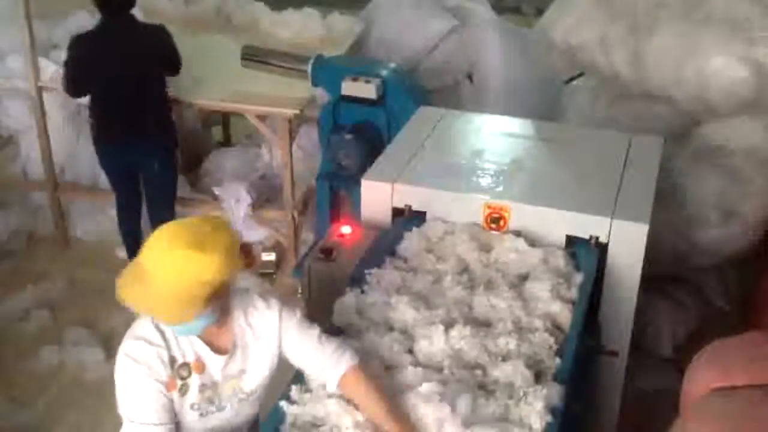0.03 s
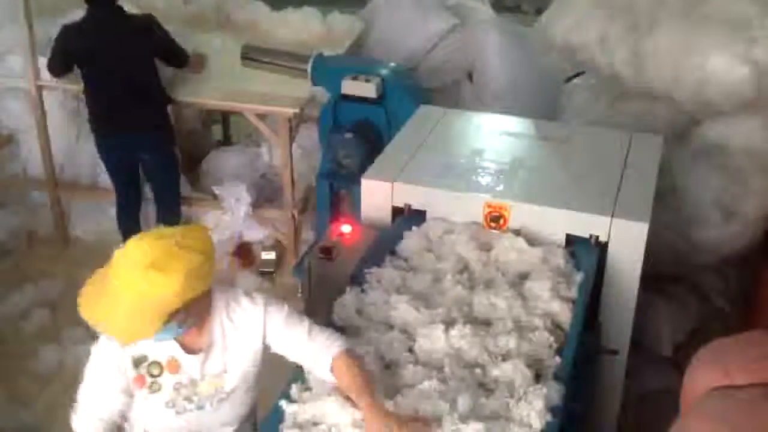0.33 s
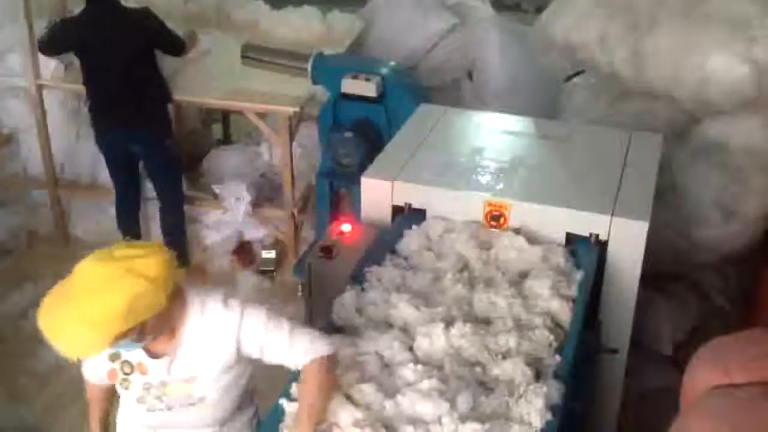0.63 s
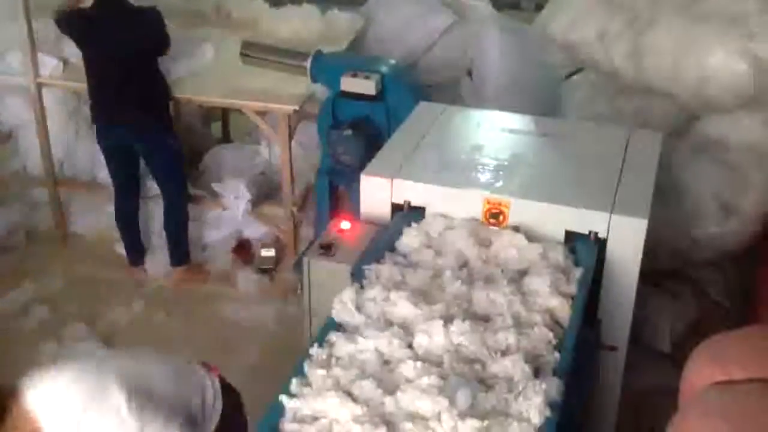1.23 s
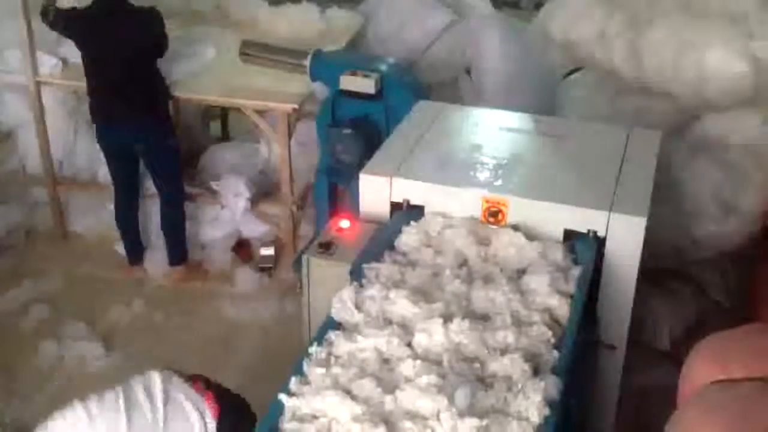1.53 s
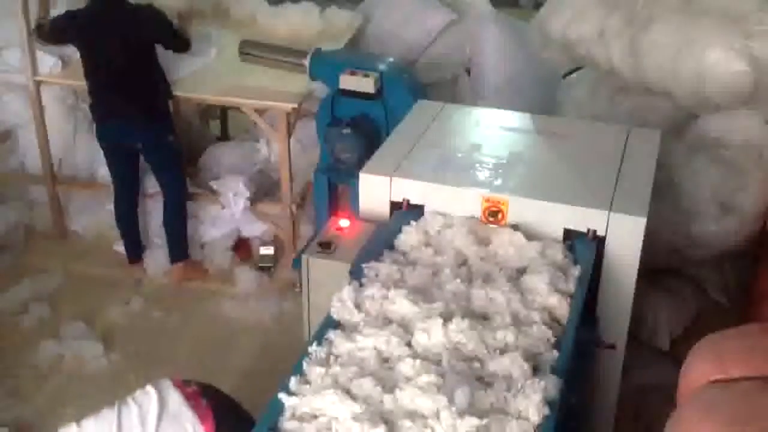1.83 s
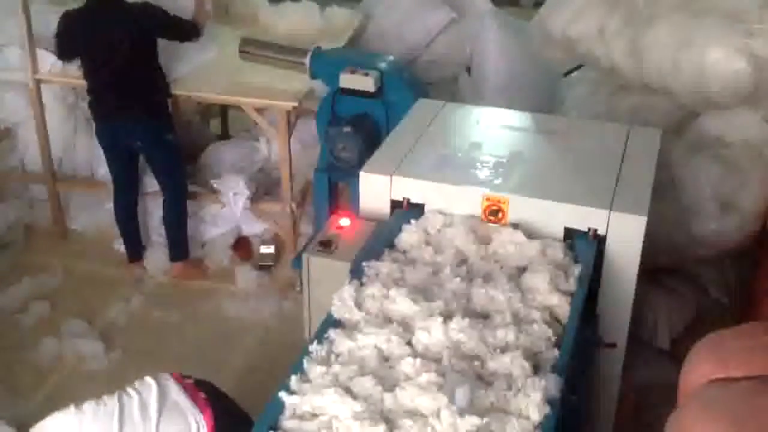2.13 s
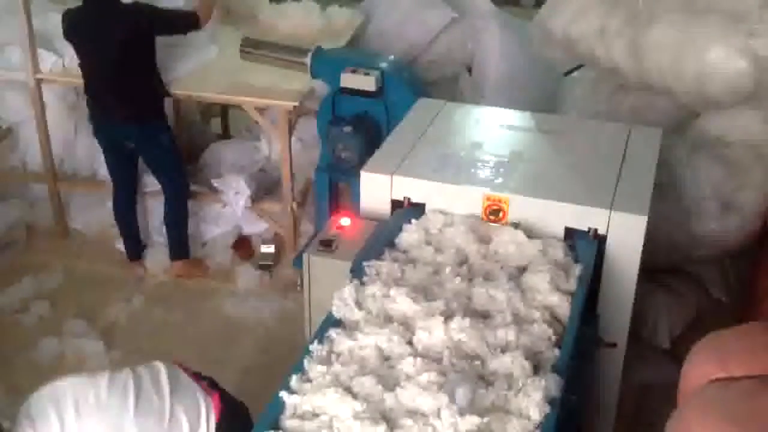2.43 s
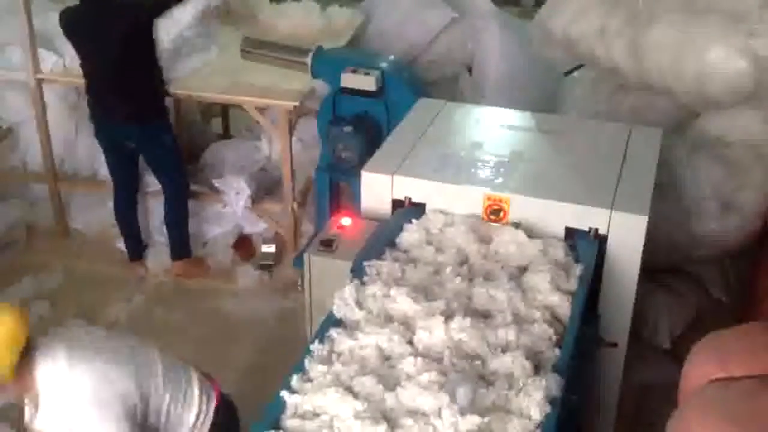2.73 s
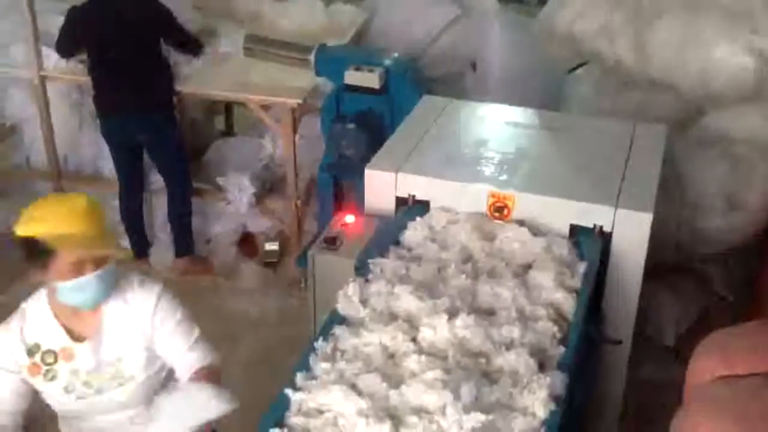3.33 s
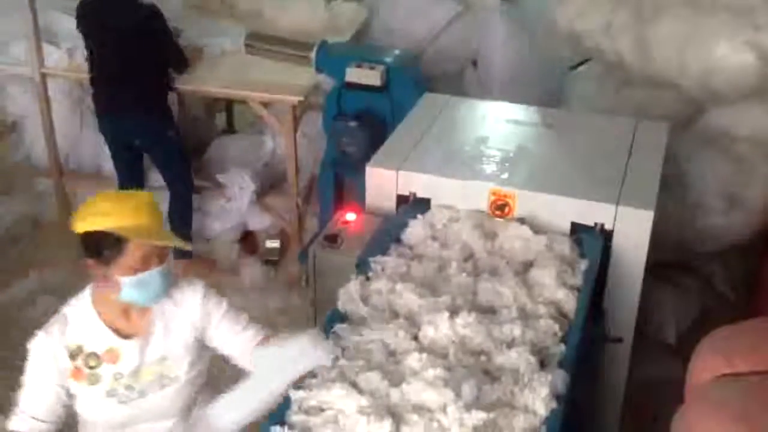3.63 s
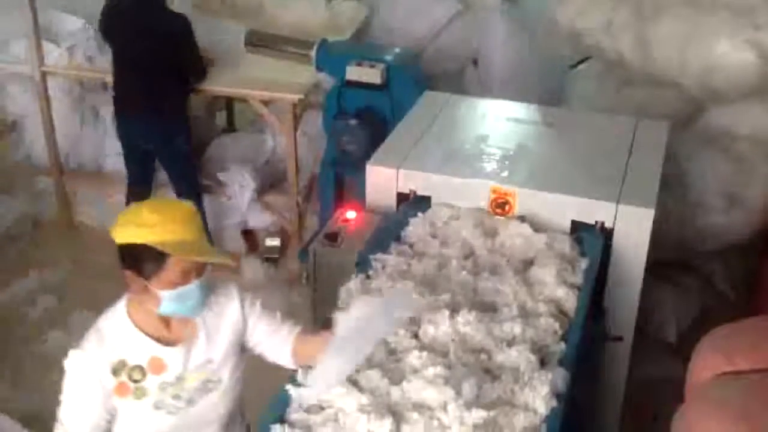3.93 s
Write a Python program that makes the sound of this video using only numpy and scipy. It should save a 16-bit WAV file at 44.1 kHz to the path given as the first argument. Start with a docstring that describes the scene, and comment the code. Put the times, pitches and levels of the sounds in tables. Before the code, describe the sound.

A fiber opening machine runs throughout, a few steps away in a workshop. Its blower drones on one strong, fairly low tone, with a belt throbbing quickly beneath and air whirring through the casing. Two soft, hollow whistles come and go over a faint hiss of fibers. At about 3.5 seconds something hard knocks once, with a low thud and a brief, scraping metallic rattle, while the drone continues.

```python
"""A workshop, with the microphone a few steps from a steadily running fiber opening machine.
Its five-bladed blower drones on one strong tone and the belt drive throbs beneath it. Air whirs through
the resonances of casing and duct, two duct whistles come and go, and fibers hiss in the rollers.
Near the end something hard knocks once and rattles briefly through the machine."""
import sys
import numpy as np
from scipy import signal
from scipy.fft import rfft, irfft, next_fast_len
from scipy.io import wavfile
from scipy.ndimage import map_coordinates

SR = 44100
rng = np.random.default_rng(int(sys.argv[2]) if len(sys.argv) > 2 else 0)


def wav_out(sig):
    """Save sig, one row per channel (or a flat mono array), as 16-bit PCM at SR to the path in sys.argv[1]."""
    wavfile.write(sys.argv[1], SR, np.round(np.clip(np.atleast_2d(sig).T, -1, 1) * 32767).astype(np.int16))


N = 176400
T = np.arange(N) / SR

# Hiss of the fibers, and of a catching tuft. Each row: frequency in Hz, relative density in dB.
HISS_SPECTRUM = [(1500, -24.5), (4000, -5.5), (5300, -3.5), (6100, 1.5), (6900, 1), (7800, -5), (9000, -10),
                 (10000, -12.5), (11300, -8), (12300, -8), (13500, -10), (15200, -15)]
TUFT_SPECTRUM = [(2000, -11), (5000, -3.5), (9500, -2.5), (13000, 0.5), (15200, -6)]
# Tufts catching in the rollers. Each row: peak time in seconds, level in dB, half-width in seconds.
TUFT_CATCHES = [(1.41, -52.5, 0.022), (2.23, -52.5, .06), (2.665, -47.5, .013), (2.97, -52.5, 0.018)]
# Rush of the air. Each row: frequency in Hz, relative density in dB.
AIR_SPECTRUM = [(25, -41), (60, -30), (100, -14), (160, -0.5), (215, 0), (260, 5), (350, 3.5), (445, -1.5),
                (478, -5), (510, -1.5), (750, 0), (1000, -2), (1080, -6), (1320, -8), (1480, -10.5),
                (2100, -9.5), (2700, -13.5), (3600, -21), (5000, -30.5), (9000, -50.5)]
# Resonances of casing and duct. Each row: centre in Hz, width in Hz, rms level in dB.
CASING_MODES = [(161.2, 18, -40.5), (290, 24, -29.5), (325.3, 14, -37), (368.7, 22, -34), (406.8, 6.9, -38),
                (431.3, 12, -40), (567.8, 14, -37), (635.4, 14, -36.5), (667.4, 13, -43.5),
                (689.5, 15, -38.5), (721.6, 12, -40.5), (811.3, 9.8, -39), (909, 10, -36), (974, 14, -40),
                (1123, 12, -44.5), (1206, 16, -43), (1267, 7.4, -45.5), (1361, 45, -43), (1772, 40, -45.5),
                (2240, 14, -52)]
# Rise and fall of the two duct whistles. Each row: time in seconds, relative level in dB.
LOW_WHISTLE_LEVELS = [(0.03, -47), (0.17, -23), (0.3, -38), (0.47, -25), (0.72, -37.5), (0.86, -22),
                      (1.1, -36.5), (1.3, -30), (1.49, -21.5), (1.62, -33), (1.73, -27.5), (2.2, -32.5),
                      (2.36, -24), (2.7, -37.5), (3.18, -45), (3.35, -27), (3.6, -26.5), (3.95, -34.5)]
HIGH_WHISTLE_LEVELS = [(0.05, -34), (0.3, -35), (0.55, -35), (0.9, -27.5), (1.08, -45), (1.25, -41),
                       (1.48, -30), (1.95, -34), (2.16, -38), (2.35, -32), (2.55, -37.5), (2.68, -33),
                       (2.85, -46), (2.97, -25), (3.06, -43.5), (3.4, -31), (3.719, -37), (3.95, -42)]
# Contacts of the knock. Each row: start in seconds, level in dB.
CONTACTS = [(3.538, -25), (3.543, -24.5), (3.555, -24), (3.568, -29)]
# Scrapes around the knock. Each row: peak time in seconds, level in dB, half-width in seconds.
SCRAPE_STROKES = [(3.518, -41, .014), (3.553, -30, .012), (3.611, -36, 0.0066), (3.65, -40, .03)]
# Colour of a contact, and of a scrape. Each row: frequency in Hz, relative density in dB.
CONTACT_SPECTRUM = [(30, -17), (130, -1), (400, -4.5), (1400, -4), (2000, 1), (2600, -5), (3300, -5.5),
                    (4100, -3.5), (4700, -9), (6500, -12.5), (8000, -12), (9200, -24.5), (11000, -21.5),
                    (13200, -10.5), (15200, -20.5)]
SCRAPE_SPECTRUM = [(800, -14), (2000, 1), (2700, -4), (4100, 2.5), (5000, -6), (8000, -14.5),
                   (10000, -25.5)]
# Ring of the struck metal. Each row: frequency in Hz, level in dB, seconds to fall by 60 dB.
METAL_MODES = [(2186, -35, 0.35), (4040, -35, .3), (4100, -35, 0.28), (6070, -47, 0.24), (13250, -43, .2)]
# Low wavering hums of the machine, including side tones of the belt's throb.
# Each row: frequency in Hz, level in dB.
MACHINE_HUMS = [(154, -44.5), (188.5, -49.5), (213.2, -46.5), (308.8, -39), (378, -38.5)]
# Weaker tones of the shaft. Each row: multiple of the shaft speed, level in dB.
SHAFT_ORDERS = [(2, -53), (3, -44.5), (4, -46.5), (10, -40.5), (15, -47.5)]
# Rise and fall of the blade tone. Each row: time in seconds, level in dB.
BLADE_LEVELS = [(0.05, -8.5), (0.83, -10.5), (0.86, -9.5), (1.93, -9.5), (1.99, -12), (2.07, -9),
                (2.41, -10), (2.57, -8), (2.8, -11.5), (2.96, -8.5), (3.32, -10.5), (3.51, -8.5),
                (3.58, -10.5), (3.64, -6.5), (3.69, -12), (3.8, -7), (3.91, -11.5), (3.95, -9.5)]


def amp(db):
    """Decibels to gain."""
    return 10 ** (np.asarray(db) / 20)


def unit(x):
    """Scale to rms 1."""
    return x / np.sqrt(np.mean(x ** 2) + 1e-20)


def wobble(rate):
    """A smooth random curve with rate knots a second."""
    return map_coordinates(rng.standard_normal(1024), [T * rate + 2], mode="wrap")


def filtered(x, response):
    """Filter x by a gain given as a function of Hz."""
    size = next_fast_len(N + 8192)
    return irfft(rfft(x, size) * response(np.fft.rfftfreq(size, 1 / SR)), size)[:N]


def noise(spectrum):
    """Noise of rms 1, coloured by rows of Hz and dB."""
    knots_hz, db = np.transpose(spectrum)
    colour = lambda hz: amp(np.interp(np.log(hz + 1), np.log(knots_hz), db))
    return unit(filtered(rng.standard_normal(N), colour))


def resonance(centre_hz, width_hz):
    """Noise of rms 1 ringing in one steep-sided resonance."""
    band = lambda hz: 2j * hz * width_hz / (centre_hz ** 2 - hz ** 2 + 2j * hz * width_hz)
    return unit(filtered(rng.standard_normal(N), lambda hz: band(hz) ** 3))


def tone(cycles):
    """A sine of rms 1 with a random starting phase."""
    return np.sqrt(2) * np.sin(2 * np.pi * (cycles + rng.random()))


def decay(start, t60):
    """An envelope that jumps up at start and falls 60 dB in t60 seconds."""
    return (T >= start) * np.exp(-np.log(1000) * np.maximum(T - start, 0) / t60)


def swells(rows):
    """An envelope with one bell-shaped swell for each row."""
    return sum(amp(db) * np.exp(-.5 * ((T - peak) / width) ** 2) for peak, db, width in rows)


def workshop(x, walls_db=-11, low_cut_hz=400):
    """Short reflections off the walls join the direct sound; the overall level stays the same."""
    tail = (rng.standard_normal(N) * decay(.004, t60=.3))[:SR // 2]
    echo = signal.fftconvolve(x, tail / np.linalg.norm(tail))[:N]
    echo = filtered(echo, lambda hz: hz / (hz + low_cut_hz))
    return unit(x + amp(walls_db) * echo) * np.std(x)


def fibers(hiss_db=-45):
    """Fibers in the rollers give a faint, fluttering hiss, brighter for a moment where a tuft catches."""
    hiss = amp(hiss_db + 0.56 * wobble(20) + .3 * wobble(3)) * noise(HISS_SPECTRUM)
    return hiss + swells(TUFT_CATCHES) * noise(TUFT_SPECTRUM)


def belt(hum_hz=165.4, turn_hz=11.37, level_db=-35.5, depth=.75, uneven_db=2):
    """A low hum swells, unevenly, once for each turn of the belt."""
    turns = turn_hz * (T - .03) + 0.046 * wobble(4.8)
    throb = 1 + depth * np.cos(2 * np.pi * turns)
    return amp(level_db) * unit(amp(uneven_db * wobble(8)) * throb * tone(hum_hz * T))


def duct_whistles(low_hz=634, high_hz=927, trim_db=-1, flutter_db=1, slip_cycles=0.2):
    """Two hollow whistles come and go in the duct, unsteady in level and pitch."""
    whistles = 0
    for hz, levels in ((low_hz, LOW_WHISTLE_LEVELS), (high_hz, HIGH_WHISTLE_LEVELS)):
        level_db = np.interp(T, *np.transpose(levels)) + trim_db + flutter_db * wobble(25)
        whistles += amp(level_db) * tone(hz * T + slip_cycles * wobble(22))
    return whistles


def air_whir(rush_db=-25.5, swell_db=2):
    """Turbulent air rushes through casing and duct, exciting resonances that each swell on their own."""
    rings = sum(amp(db) * unit(amp(swell_db * wobble(3.93)) * resonance(hz, width))
                for hz, width, db in CASING_MODES)
    rush = amp(rush_db + 1.1 * wobble(14)) * noise(AIR_SPECTRUM)
    return rings + rush


def knock(thud_hz=130, thud_db=-25, attack_s=0.0069, room_db=-8.5):
    """Something hard strikes and scrapes in a quick cluster, with a low thud and a short metal ring."""
    power = 0
    for onset, db in CONTACTS:
        direct = decay(onset, t60=0.062)
        room_tail = amp(room_db) * decay(onset, t60=0.55)
        power += amp(db) ** 2 * (direct ** 2 + room_tail ** 2)
    start = CONTACTS[0][0]
    rise = 1 - np.exp(-np.maximum(T - start, 0) / attack_s)
    thud = amp(thud_db) * decay(start, t60=.4) * np.sin(2 * np.pi * thud_hz * (T - start))
    ring = sum(amp(db) * decay(start, t60) * tone(hz * T + .15 * wobble(120))
               for hz, db, t60 in METAL_MODES)
    rattle = np.sqrt(power) * noise(CONTACT_SPECTRUM)
    scrapes = swells(SCRAPE_STROKES) * noise(SCRAPE_SPECTRUM)
    return rattle + scrapes + rise * (thud + ring)


def blower(shaft_hz=59.014, blades=5, speed_drift=0.00036):
    """The strong blade tone, weaker shaft orders and low wavering hums follow one drifting shaft speed."""
    shaft_time = np.cumsum(1 + speed_drift * wobble(5.08)) / SR
    blade_gain = amp(np.interp(T, *np.transpose(BLADE_LEVELS)))
    drone = blade_gain * tone(blades * shaft_hz * shaft_time)
    orders = sum(amp(db) * tone(order * shaft_hz * shaft_time) for order, db in SHAFT_ORDERS)
    hums = sum(amp(db + 4.3 * wobble(3)) * tone(hz * shaft_time) for hz, db in MACHINE_HUMS)
    return drone + orders + hums


def scene():
    """The whole machine from a few steps away, in mono."""
    tones = blower() + belt() + duct_whistles()
    steady_noise = workshop(air_whir() + fibers())
    return (tones + steady_noise + knock())[None]


def record(dry, top_hz=15350):
    """The microphone passes nothing above its band limit."""
    return np.array([filtered(channel, lambda hz: hz < top_hz) for channel in dry])


dry = scene()
out = record(dry)
wav_out(out)
```